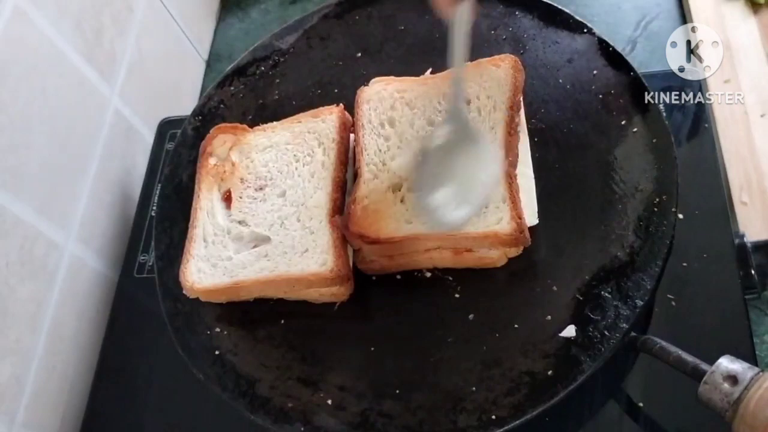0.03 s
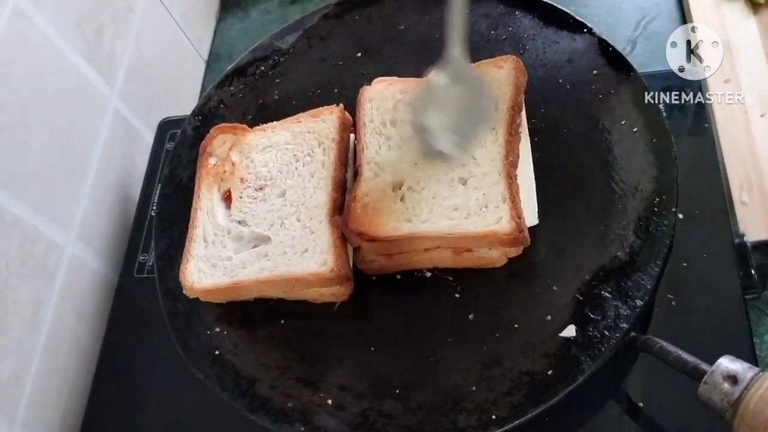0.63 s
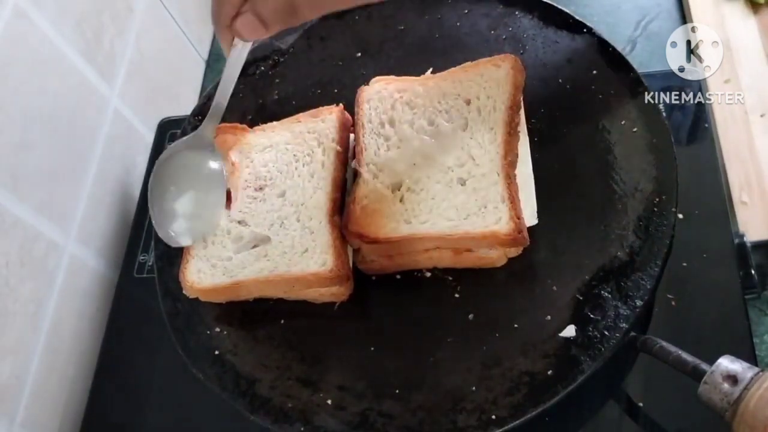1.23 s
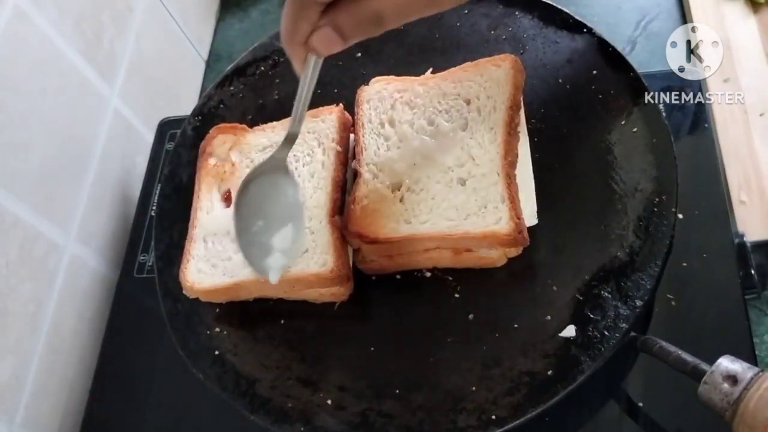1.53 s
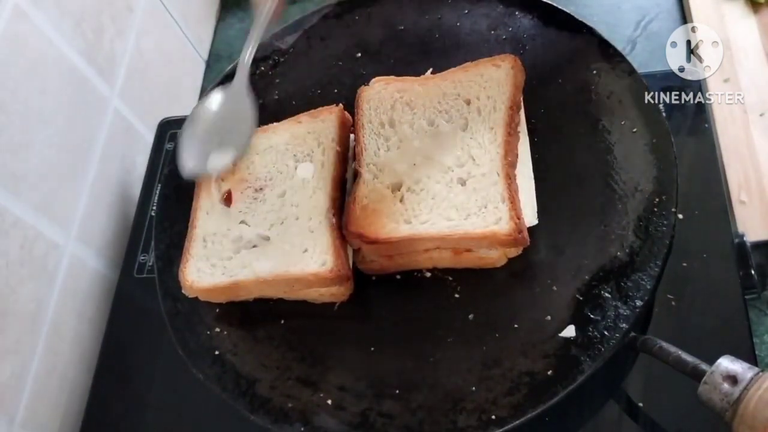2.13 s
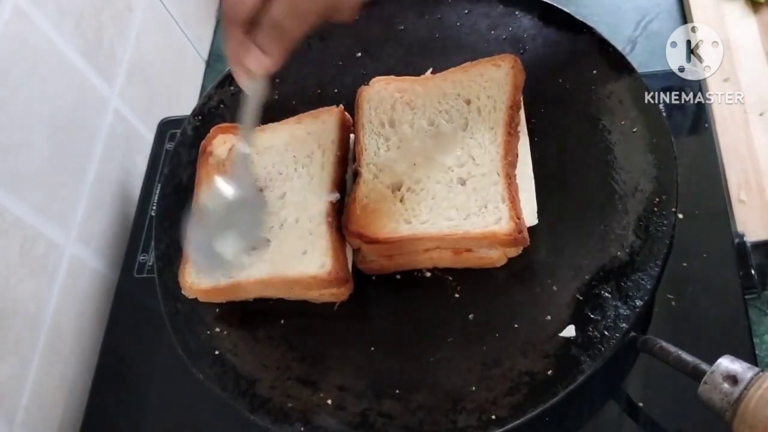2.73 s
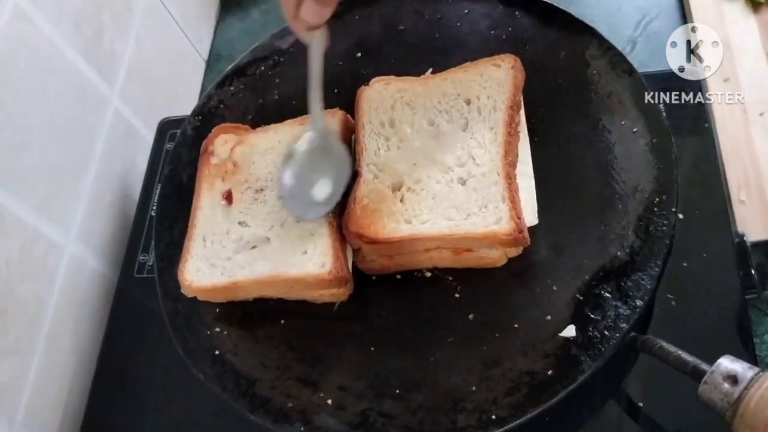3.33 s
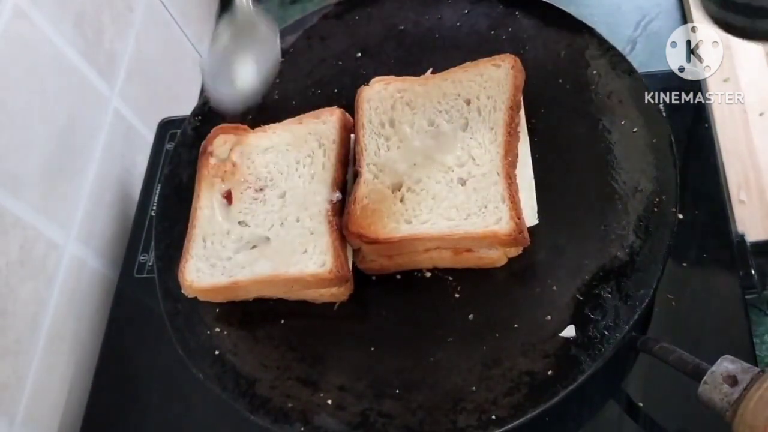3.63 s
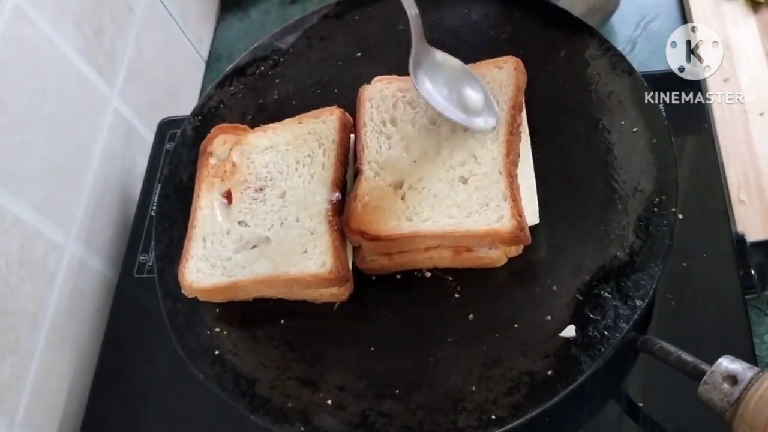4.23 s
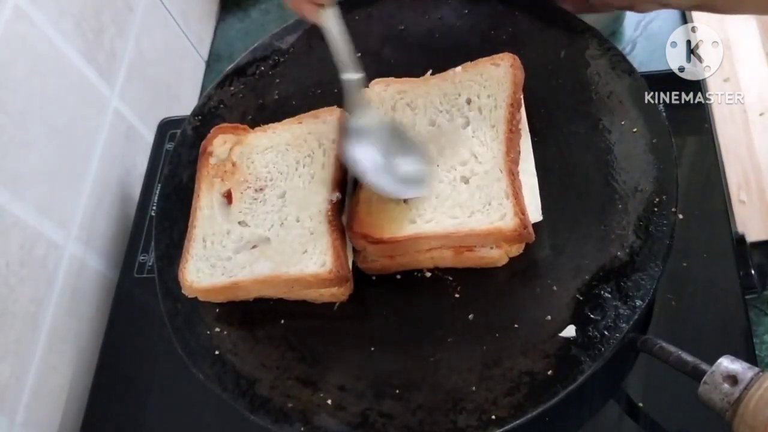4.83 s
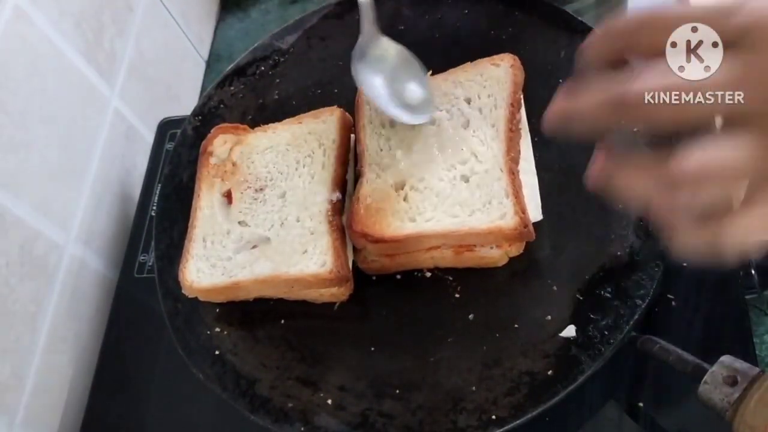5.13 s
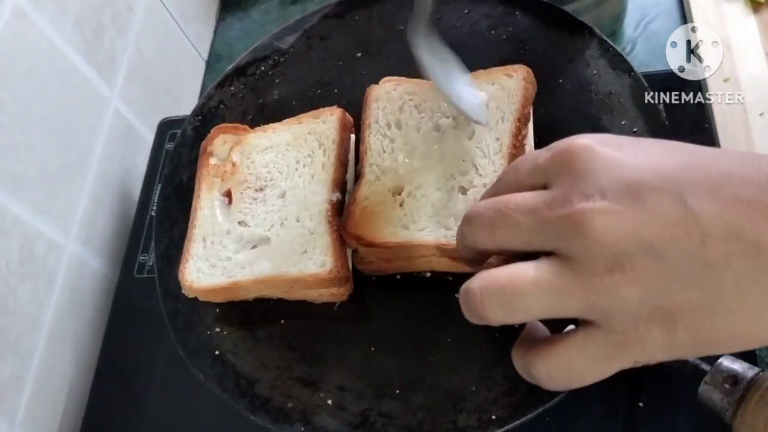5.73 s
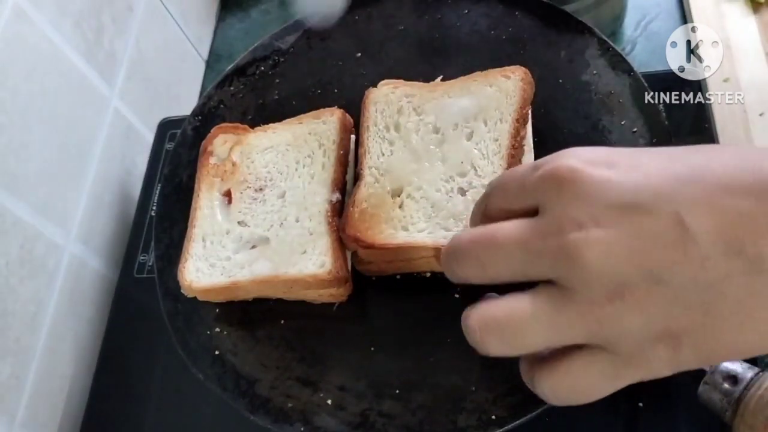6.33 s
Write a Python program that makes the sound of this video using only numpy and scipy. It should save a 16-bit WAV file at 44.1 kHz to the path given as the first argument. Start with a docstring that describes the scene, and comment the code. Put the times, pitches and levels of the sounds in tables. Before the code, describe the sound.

A spoon spreads over toasted bread in short crackly strokes, with one loud metal dish clank, over a low fan hum.

```python
"""A steel spoon spreads over toasted bread on a pan in short, crackly strokes, in a small kitchen.
The crust crumbles and snaps, the soft bread rubs, and twice the pan gives a dull knock.
A metal dish is set down once on the counter; it rings so loudly that a limiter turns it down.
Under it all a fan rumbles, hisses and hums, with a faint electrical whine."""
import sys
import numpy as np
from scipy import signal
from scipy.fft import rfft, irfft, next_fast_len
from scipy.io import wavfile
from scipy.ndimage import uniform_filter1d, minimum_filter1d, map_coordinates

SR = 44100
rng = np.random.default_rng(int(sys.argv[2]) if len(sys.argv) > 2 else 0)


def dump(signal):
    """Clip the signal to [-1, 1] and save it as 16-bit WAV at the path in sys.argv[1]."""
    limited = np.clip(np.atleast_2d(signal).T, -1, 1)
    pcm = np.round(limited * 32767).astype(np.int16)
    wavfile.write(sys.argv[1], SR, pcm)


N = 285768

# Levels are set before mixing. A fade_s is the time a sound takes to fall by 60 dB.
# spoon strokes: start_s, rise_s, lift_after_s, fade_s, rasp_db, rub_above_rasp_db
STROKES = [ (0.10, .03, 0.041, .4, -66, 4.5), (0.28, 0.067, 0.099, 0.58, -67.5, -12),
           (0.53, .03, .09, 1, -66, -0.5), (0.73, 0.063, 0.14, .4, -66.5, 3.5),
           (0.88, .01, 0.07, 0.3, -57.5, -9), (1.392, .005, .083, 0.13, -47.5, -5),
           (1.72, 0.043, 0.076, .45, -55.5, -4), (2.17, 0.051, 0.097, 0.48, -52, -9),
           (2.51, .012, 0.047, 0.5, -48.5, -10), (2.845, 0.014, 0.097, 0.28, -49.5, -11),
           (3.02, 0.035, 0.15, .3, -62, 1), (3.185, 0.031, 0.088, 0.33, -49.5, -11),
           (3.43, 0.055, 0.13, 0.41, -53, -8), (3.72, .18, .3, .8, -68.5, 4),
           (4.211, 0.0073, 0.077, 0.18, -51, 5), (4.53, .045, 0.058, 0.39, -50.5, 7),
           (4.79, 0.028, 0.12, 0.51, -57.5, -2.5), (4.99, 0.045, 0.11, .8, -67.5, 7.5),
           (5.362, 0.019, 0.035, 0.22, -55, -6), (5.506, .006, .014, .12, -58, 0),
           (5.575, .03, .12, 0.26, -51, -3.5), (5.90, 0.065, 0.071, 0.18, -44.5, -4),
           (6.14, 0.088, 0.14, 0.14, -48, -1), ]
# rasp of the left slice, rasp of the right slice, rub of the soft bread: pitch_hz, level_db
LEFT_CRUST = [(1200, -29), (2000, -12.5), (2550, -1), (3600, 2.5), (4200, -3), (4900, -7), (6200, -3.5),
              (7600, -9), (8300, -12.5), (11200, -9), (12200, -9.5), (15800, -12.5)]
RIGHT_CRUST = [(1180, -28), (2000, -22), (2530, 0), (3390, -5.5), (3990, -1.5), (4320, -11), (4670, -6),
               (5000, -10), (6650, -6.5), (8330, -13.5), (10800, -9.5), (12100, -11.5), (14900, -14),
               (15800, -10)]
SOFT_BREAD = [(400, -19), (900, -12.5), (1500, -2), (2300, -4), (3200, -12.5), (6000, -40)]
# when the spoon is on the left slice: start_s, end_s
LEFT_SLICE = (1.3, 4.4)
# snaps of the crust: start_s, level_db, low_tap_db, treble_db
SNAPS = [(0.883, -33, 3, -29), (1.3636, -41, -21, -15), (1.3977, -37.5, -18, -24), (1.4626, -37, -20, -6),
         (2.227, -37.5, -27, -19), (2.2483, -36, -25, -10), (2.5159, -32.5, -14, -20),
         (2.5658, -27.5, -30, -14), (2.9008, -32.5, -26, -6), (2.9377, -29.5, -34, -6),
         (3.212, -36, -15, 3), (3.2816, -37.5, -17, -7), (3.5202, -32.5, -28, -19), (4.2199, -33, -11, -17),
         (4.2664, -35, -9, -27), (4.594, -30, 5, -27), (4.896, -38, -13, -23), (4.938, -37, 4, -13),
         (5.51, -43, -2, -10), (6.0534, -42, -6, -20)]
# knocks on the pan: start_s, level_db
KNOCKS = [(3.280, -33.5), (4.893, -46)]
# ringing tones of the pan, the dish and the counter: pitch_hz, level_db, fade_s
PAN_TONES = [(127, 7.5, 0.15), (196, -4, 0.22), (251, -1.5, 0.24), (330, -5, 0.21), (432, -15, 0.082),
             (600, -8, 0.057), (790, -12, 0.089), (922, -4, 0.079), (980, -5.5, 0.07), (1180, -13, 0.062)]
DISH_TONES = [(308, -10, .28), (388, 2.5, .225), (569, -16, .2), (621, -5, .35), (632, -16, .36),
              (655, -17, .18), (747, -27, .28), (857, -25, .33), (1006, -24, .24), (1030, -25, .18),
              (1138, -15.5, .28), (1257, -30, .35), (1472, -33, .26), (1654, -36, .3), (1804, -32.5, .46),
              (2099, -27.5, .48), (2122, -31, .4), (2335, -37, .32), (2532, -36, .3), (3121, -34, .38),
              (3165, -33, .34), (4322, -37, .33), (4400, -34, .35), (5281, -41.5, .32), (6013, -33.5, .22),
              (6815, -42, .22), (8436, -46, .2), (10310, -45, .17), (12730, -48, .13)]
COUNTER_TONES = [(124.8, -15.5, 0.37), (210.5, -11, .3), (261.7, -2.5, 0.17), (281.7, -3, 0.22),
                 (331.3, -3, 0.16), (452, -13, 0.19), (493.4, -15, 0.24)]
# crack of the dish meeting the counter: pitch_hz, level_db
CRACK = [(50, -70), (130, -34), (300, -9), (550, 5), (800, -3), (1100, -5.5), (1600, -16.5), (2200, -16.5),
         (2800, -21.5), (3200, -16.5), (4500, -18.5), (5650, -32.5), (6050, -24), (15800, -37.5)]
# the dish sends more sound to one side: pitch_hz, left_up_right_down_db
DISH_LEAN = [(420, 1), (620, 3), (900, -1)]
# late swell of one dish tone: start_s, rise_s, fade_after_s, fade_s, level_db
AFTER_RING = (4.545, 0.03, 0.05, 0.3, -37)
# the fan's rumble, wide hiss and narrow hiss: pitch_hz, level_db
RUMBLE = [(12, -43), (20, -14.5), (64, -11), (80, -4.5), (101, -1), (155, -8), (174, -9), (198, -10.5),
          (298, -11.5), (362, -16.5), (441, -15.5), (503, -18.5), (546, -10.5), (573, -14), (1000, -24),
          (1300, -47), (2200, -120)]
HISS = [(590, -34), (1000, -2), (1250, 0), (1520, -1), (1700, -2), (2300, -3.5), (2860, -9), (3150, -7),
        (4950, -15.5), (6000, -9), (7200, -19.5), (9300, -24), (10600, -20.5), (15800, -25)]
NARROW_HISS = [(4500, -60), (5200, -17), (5480, -2), (5750, -7), (6200, -18), (7500, -60)]
# swells of the narrow hiss: peak_s, level_db
SWELLS = [(0.41, -75), (1.2, -68.5), (1.97, -69.5), (4.05, -72)]
# the fan's motor hum and electrical whine: pitch_hz, level_db
HUM = [(97.5, -54), (121, -57), (147, -55), (218, -64), (452, -64.5), (538.3, -62.5)]
WHINE = [(1535, -76.5), (2266, -76), (3580, -83), (6056, -81), (8694, -81.5), (10169, -85.5)]
# how alike the fan sounds left and right: pitch_hz, likeness (1 = the same, 0 = unrelated)
LIKENESS = [(60, 0.91), (130, 1), (290, 0.65), (640, 0.25), (1410, -0.17), (3100, -0.063), (6820, -0.071),
            (15000, -0.26)]
# echo of the kitchen: pitch_hz, fade_s
ECHO_FADES = [(150, 0.59), (600, 0.5), (2500, 0.29), (6000, 0.28), (14000, 0.24)]

BRUSH_DB, BRUSH_UNTIL_S = -73, 0.79  # at first the spoon also brushes the bread between strokes
SNAP_FADE_S = 0.023
CLANK_S, SETTLE_S = 4.3728, 0.059  # when the dish lands, and how much later it lies flat
AFTER_RING_HZ = 624
RUMBLE_DB, HISS_DB, NARROW_DB = -47, -60.42, -77.5
SWELL_HALF_WIDTH_S = 0.095
TOP_HZ = 15800


def spoon():
    """Each stroke breaks crumbs off the crust (rasp) and drags over the soft bread (rub)."""
    t = np.arange(N) / SR
    rasp = amp(BRUSH_DB + 2.8 * wobble(11.4)) * (t < BRUSH_UNTIL_S)
    rub = rasp.copy()
    for start_s, rise_s, lift_s, fade_s, rasp_db, rub_db in STROKES:
        stroke = amp(rasp_db) * envelope(t - start_s, rise_s, lift_s, fade_s)
        rasp += stroke
        rub += amp(rub_db) * stroke
    grip = unit(amp(1.1 * wobble(110)))  # the spoon sticks and slips on the pores
    crumbs = tiny_cracks(per_second=3500, spread_db=2) + 0.87 * rng.standard_normal((2, N))
    crumbs = patchy(crumbs, depth_db=3.5)
    on_left = (t > LEFT_SLICE[0]) & (t < LEFT_SLICE[1])
    crackle = np.where(on_left, coloured(crumbs, LEFT_CRUST), coloured(crumbs, RIGHT_CRUST))
    soft_crumbs = patchy(tiny_cracks(per_second=3000, spread_db=1), depth_db=2)
    drag = coloured(soft_crumbs, SOFT_BREAD)
    return grip * (amp(-1) * rasp * crackle + amp(-4) * rub * drag)


def tiny_cracks(per_second, spread_db):
    """The bread cracks at random moments, a few times much more strongly than the rest."""
    clicks = (rng.random(N) < per_second / SR) * rng.choice([-1, 1], N)
    sizes = amp(spread_db * np.clip(rng.standard_normal(N), -2, 2))
    sides = 1 + 2.1 * rng.standard_normal((2, N))
    return unit(clicks * sizes * sides)


def patchy(sound, depth_db):
    """As the spoon's contact point wanders, patches of pitch and time get louder or softer."""
    cells = signal.stft(sound, nperseg=256)[2]
    patches = uniform_filter1d(rng.standard_normal(cells.shape[1:]), size=4, axis=0)
    patches = uniform_filter1d(patches, size=6, axis=1)
    return unit(signal.istft(cells * amp(depth_db * unit(patches)), nperseg=256)[1][:, :N])


def crust_snaps():
    """The spoon's edge catches, and larger bits of crust give way in very short bursts."""
    out, t = np.zeros((2, N)), np.arange(SR // 20) / SR
    for start_s, level_db, tap_db, treble_db in SNAPS:
        colour = [(100, -60), (800, tap_db - 12), (1400, tap_db + 5), (2300, tap_db + 7),
                  (3600, 0), (6500, treble_db + 4), (15000, treble_db - 5)]
        noise = rng.standard_normal((2, len(t))) + 0.39 * rng.standard_normal(len(t))
        add(out, start_s, amp(level_db - 5.5 - 60 * t / SNAP_FADE_S) * coloured(noise, colour))
    return out


def pan_knocks():
    """The spoon presses through the bread and the pan gives a dull knock."""
    out, t = np.zeros((2, N)), np.arange(SR // 3) / SR
    for start_s, level_db in KNOCKS:
        add(out, start_s, amp(level_db - 4.5) * ring(PAN_TONES, t, apart_hz=900))
    return out


def dish():
    """One hard landing: a crack, a short rattle of the rim, ringing metal and a thud of the counter."""
    tone, noise, t = np.zeros((2, N)), np.zeros((2, N)), np.arange(SR) / SR
    metal = amp(1.5) * ring(DISH_TONES, t, apart_hz=514)
    thud = amp(-3.5) * ring(COUNTER_TONES, t, apart_hz=600)
    muffle = amp(-8 * np.clip((t - SETTLE_S) / 0.11, 0, 1))  # lying flat on the counter dulls the ring
    add(tone, CLANK_S, (metal + thud) * muffle)
    tone = filtered(tone, lambda hz: amp(along(DISH_LEAN, hz) * np.array([[1], [-1]])))
    crack = amp(-13.5 - 60 * t / 0.022)
    rattle = amp(-14.3 - 60 * t / 0.145)
    add(noise, CLANK_S, (crack + rattle) * coloured(rng.standard_normal((2, len(t))), CRACK))
    return (kitchen(tone, echo_db=-10, gap_s=0.012, low_hz=780)
            + kitchen(noise, echo_db=-1, gap_s=0.0057, low_hz=396))


def after_ring():
    """As the clank dies away, one tone of the dish comes up again and fades."""
    start_s, rise_s, hold_s, fade_s, level_db = AFTER_RING
    t = np.arange(N) / SR - start_s
    tone = np.sin(2 * np.pi * AFTER_RING_HZ * t + rng.uniform(0, 2 * np.pi))
    return amp(level_db) * envelope(t, rise_s, hold_s, fade_s) * tone


def ring(tones, t, apart_hz):
    """A struck object rings with fading tones; above apart_hz, left and right are out of step."""
    out = np.zeros((2, len(t)))
    for k, (hz, level_db, fade_s) in enumerate(tones):
        shift = (-1) ** k * np.pi / 4 / (1 + (apart_hz / hz) ** 6)
        phase = rng.uniform(0, 2 * np.pi) + np.array([[shift], [-shift]])
        build_up = 1 - np.exp(-t * hz / 1.26)  # takes about one cycle
        out += amp(level_db - 60 * t / fade_s) * build_up * np.sin(2 * np.pi * hz * t + phase)
    return out


def fan():
    """Moving air, motor hum, a thin electrical whine and a narrow hiss that swells now and then."""
    t = np.arange(N) / SR
    rumble = amp(RUMBLE_DB) * rushing_air(RUMBLE)
    hiss = amp(HISS_DB + 0.5 * wobble(3.42)) * rushing_air(HISS)
    whine = amp(-1) * wavering_tones(WHINE, drift_hz=20, waver_db=0)
    swells = sum(amp(db) * np.exp(-((t - peak_s) / SWELL_HALF_WIDTH_S) ** 2) for peak_s, db in SWELLS)
    narrow = (amp(NARROW_DB) + swells) * rushing_air(NARROW_HISS)
    hum = wavering_tones(HUM, drift_hz=2.01, waver_db=2.5)
    return rumble + hiss + narrow + whine + hum


def rushing_air(colour):
    """Steady noise; left and right are alike in the bass and mostly unrelated in the treble."""
    def shares(hz):
        angle = np.arccos(np.clip(along(LIKENESS, hz), -1, 1)) / 2
        return np.array([np.cos(angle), np.sin(angle)])
    middle, side = filtered(rng.standard_normal((2, N)), shares)
    return coloured(np.array([middle + side, middle - side]), colour)


def wavering_tones(tones, drift_hz, waver_db):
    """Long tones that wander a little in pitch and loudness."""
    out = np.zeros(N)
    for hz, level_db in tones:
        phase = 2 * np.pi * np.cumsum(hz + drift_hz * wobble(25)) / SR
        out += amp(level_db) * unit(amp(waver_db * wobble(7.3)) * np.sin(phase))
    return out


def kitchen(sound, echo_db, gap_s, low_hz):
    """Tiled walls add an echo after a short gap, mostly above low_hz, with its own tail on each side."""
    hz, t, cells = signal.stft(rng.standard_normal((2, SR // 2)), SR, nperseg=256)
    fade = amp(-60 * t / along(ECHO_FADES, hz)[:, None])
    tail = signal.istft(cells * fade, SR, nperseg=256)[1]
    tail *= 1 - np.exp(-(np.arange(tail.shape[1]) / SR / gap_s) ** 2)
    echo = signal.fftconvolve(sound, tail / np.linalg.norm(tail[0]), axes=1)[:, :N]
    return sound + amp(echo_db) * filtered(echo, lambda f: f ** 2 / (f ** 2 + low_hz ** 2))


def envelope(t, rise_s, hold_until_s, fade_s):
    """Loudness over time: rise, hold, then fade."""
    return np.clip(t / rise_s, 0, 1) ** 1.2 * amp(-60 * np.maximum(t - hold_until_s, 0) / fade_s)


def amp(db):
    """Turn decibels into a number to multiply by."""
    return 10 ** (np.asarray(db) / 20)


def unit(sound):
    """Scale a sound to an average strength (rms) of 1."""
    return sound / np.sqrt(np.mean(sound ** 2) + 1e-20)


def along(points, hz):
    """Read between the rows of a (pitch_hz, value) table, on a musical (log) scale."""
    pitches, values = np.transpose(points)
    return np.interp(np.log(hz + 1), np.log(pitches + 1), values)


def wobble(per_second):
    """A smooth curve through this many random values a second."""
    values = rng.standard_normal(int(N * per_second / SR) + 4)
    return map_coordinates(values, [np.arange(N) * per_second / SR])


def filtered(sound, gain_at):
    """Turn each pitch up or down by gain_at(hz)."""
    length = sound.shape[-1]
    padded = next_fast_len(length + 8192)
    return irfft(rfft(sound, padded) * gain_at(np.fft.rfftfreq(padded, 1 / SR)), padded)[..., :length]


def coloured(sound, colour):
    """Shape a sound by a (pitch_hz, level_db) table, then scale it to strength 1."""
    return unit(filtered(sound, lambda hz: amp(along(colour, hz))))


def add(track, start_s, sound):
    """Mix a sound into the track at start_s."""
    part = track[:, round(start_s * SR):][:, :sound.shape[-1]]
    part += sound[..., :part.shape[-1]]


def scene():
    """Mix spoon, dish and fan; each pair of numbers is left_db, right_db."""
    bread = kitchen(spoon() + crust_snaps() + pan_knocks(), echo_db=-6, gap_s=0.00073, low_hz=400)
    return (bread * amp([[1.5], [0]])
            + dish()
            + fan() * amp([[0.6], [-0.6]])
            + after_ring() * amp([[-2], [2]]))


def record(dry):
    """A fast limiter turns down the loudest peaks; everything above TOP_HZ is cut."""
    needed = np.minimum(1, 0.89 / (np.abs(dry).max(axis=0) + 1e-9))
    held = minimum_filter1d(needed, size=300, origin=105)
    gain = uniform_filter1d(held, size=80)
    return filtered(dry * gain, lambda hz: hz < TOP_HZ)


dry = scene()
out = record(dry)
dump(out)
```